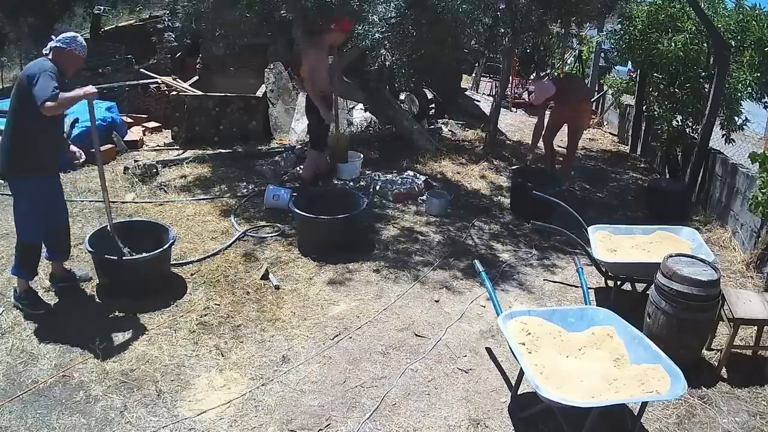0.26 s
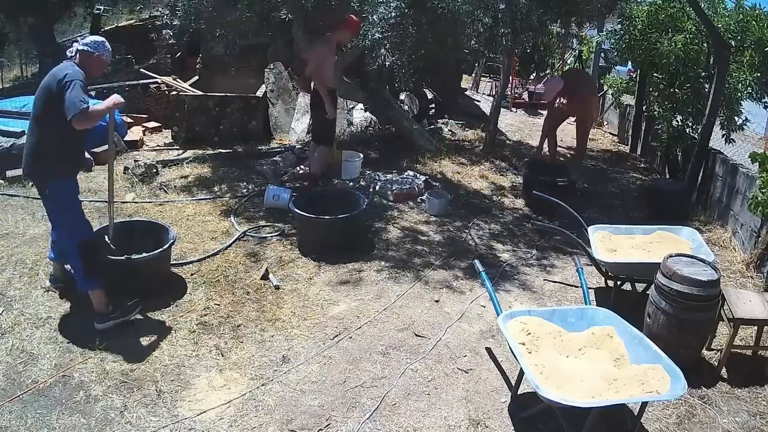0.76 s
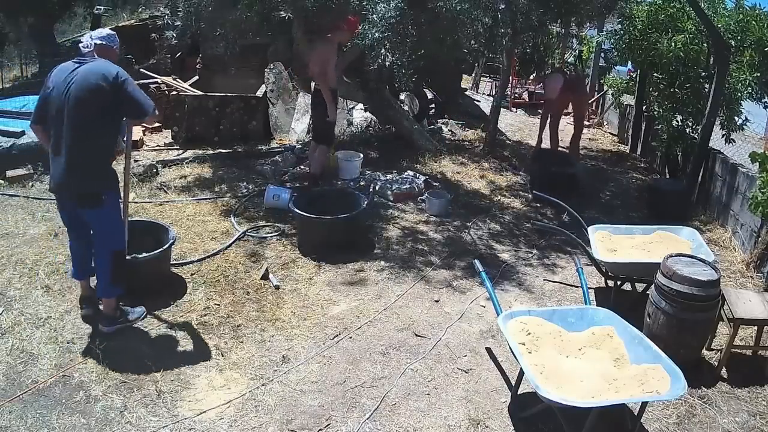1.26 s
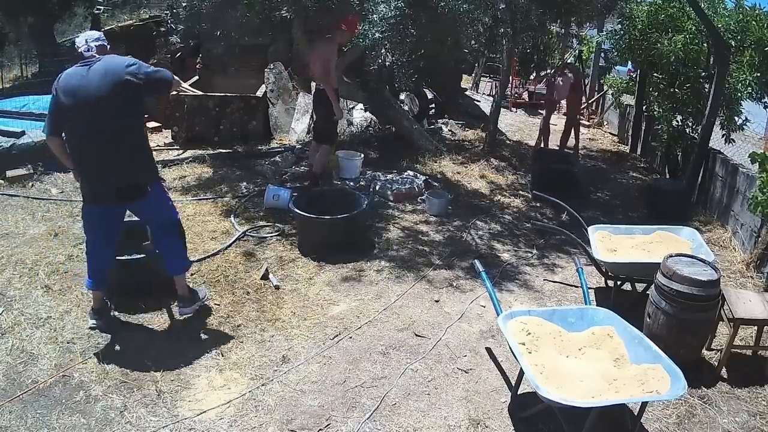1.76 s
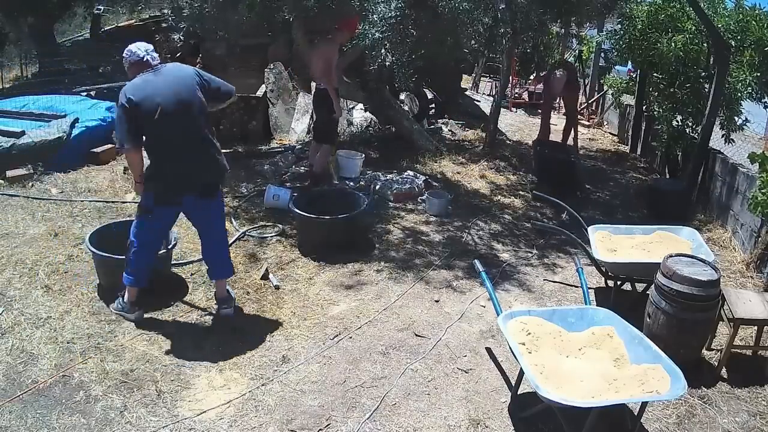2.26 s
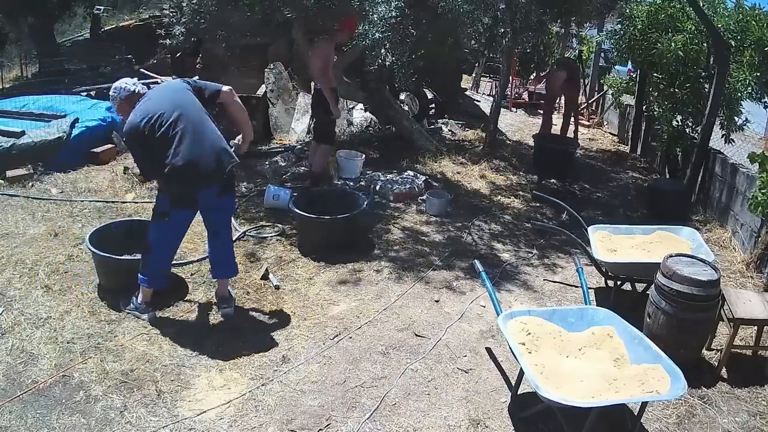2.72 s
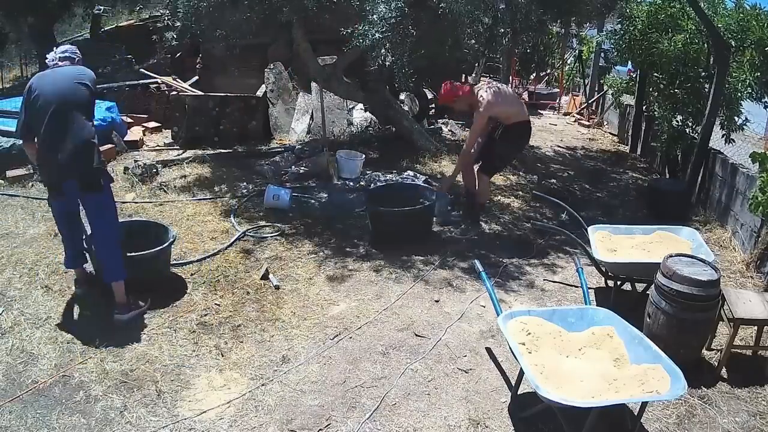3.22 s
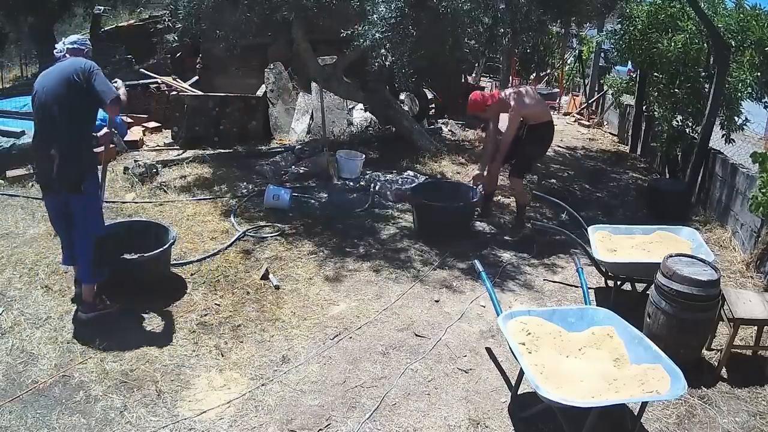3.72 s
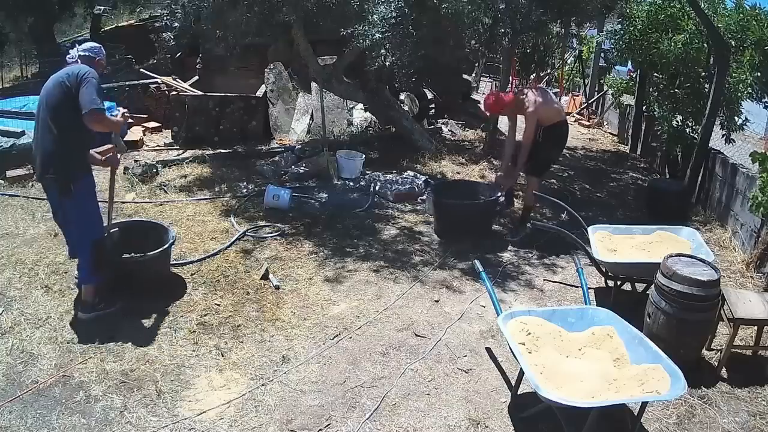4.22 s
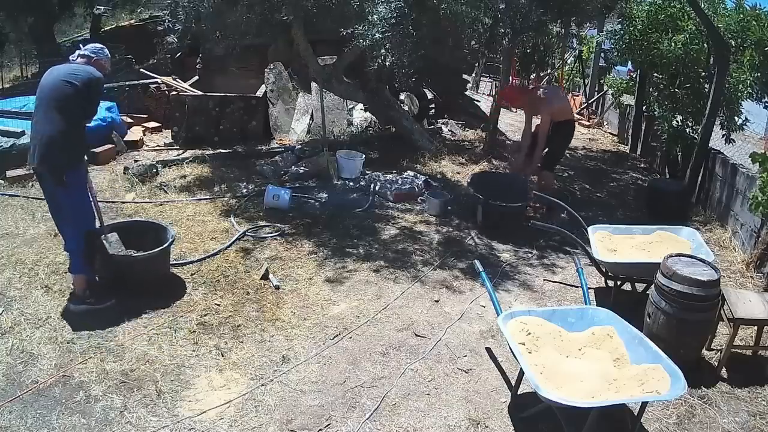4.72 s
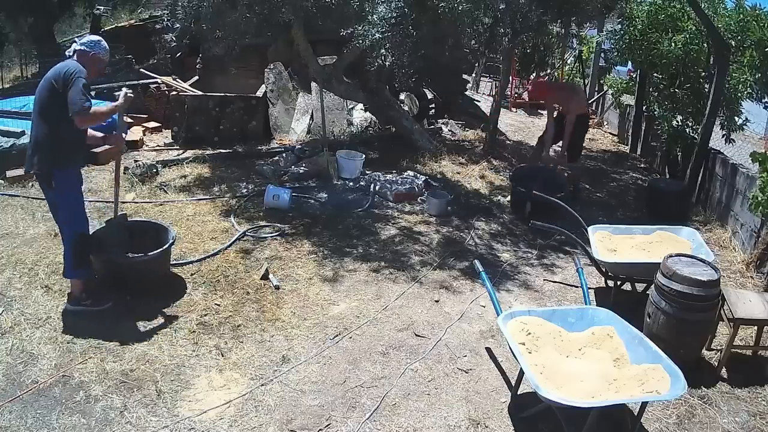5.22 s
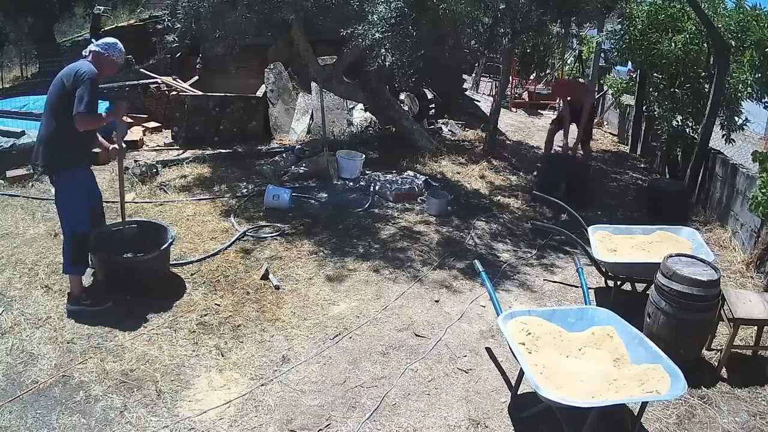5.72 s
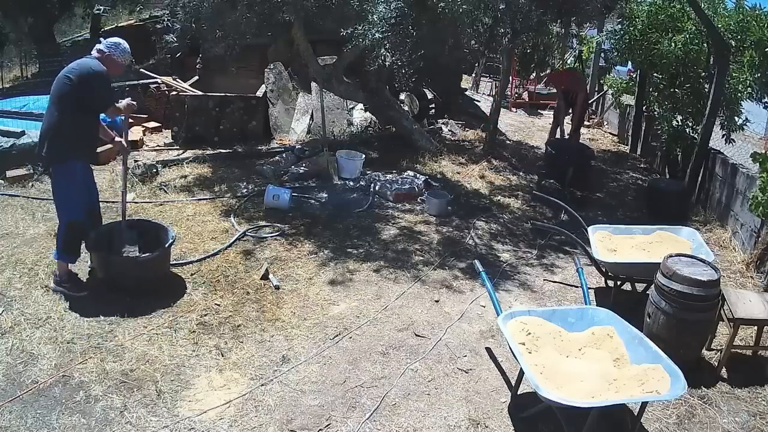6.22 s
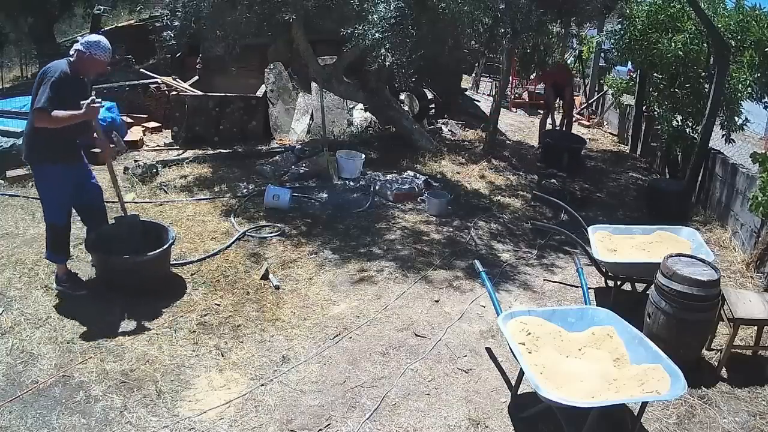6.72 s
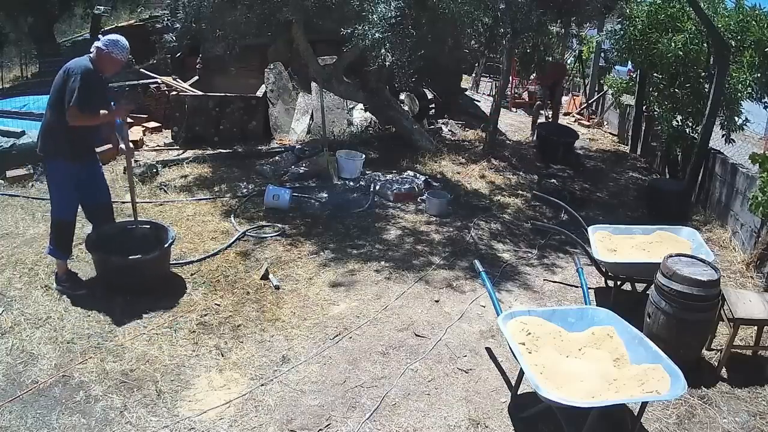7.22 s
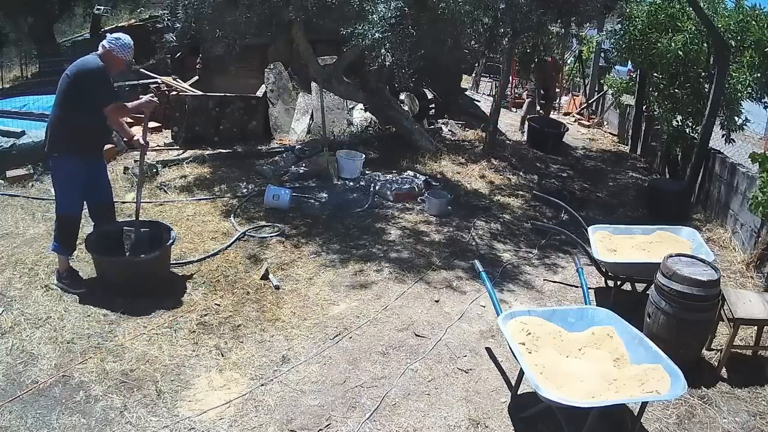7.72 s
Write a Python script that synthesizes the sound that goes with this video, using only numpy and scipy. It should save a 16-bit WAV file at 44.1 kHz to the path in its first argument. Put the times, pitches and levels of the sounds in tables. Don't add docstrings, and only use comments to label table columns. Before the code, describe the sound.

In an open yard, blades grind through wet sand and stones in rubber tubs, stroke after stroke. Hard knocks with a short metallic ring and low rubber thumps break in, loudest just before two seconds, around four and again past five. Later the scraping grows denser and louder with many small taps. A small camera some metres away picks up light wind rumble and weak echoes.

```python
import sys
import numpy as np
from scipy import signal
from scipy.fft import rfft, irfft
from scipy.io import wavfile
from scipy.ndimage import map_coordinates

SR = 44100
rng = np.random.default_rng(int(sys.argv[2]) if len(sys.argv) > 2 else 0)


def decibels_to_gain(level_db):
    exponent = np.asarray(level_db, float) / 20
    return 10 ** exponent


def materialize(psi):
    bounded = np.clip(np.atleast_2d(psi).T, -1, 1)
    quanta = np.round(bounded * 32767).astype(np.int16)
    wavfile.write(sys.argv[1], SR, quanta)


N = 351477


def unit(x):
    return x / np.sqrt(np.mean(x ** 2) + 1e-20)


def coloured(x, spectrum):
    m = 4096
    hz, db = np.transpose(spectrum)
    bins = np.fft.rfftfreq(m, 1 / SR)
    gain = decibels_to_gain(np.interp(np.log(bins + 1), np.log(hz + 1), db, -120, -120))
    cepstrum = irfft(np.log(gain + 1e-4), m)
    cepstrum[1:m // 2] *= 2
    cepstrum[m // 2 + 1:] = 0
    response = irfft(np.exp(rfft(cepstrum)), m)
    return signal.fftconvolve(x, response)[:len(x)]


def wobble(rate):
    points = rng.standard_normal(int(N * rate / SR) + 4)
    return map_coordinates(points, [np.arange(N) * rate / SR])


def add(track, s, sound):
    part = track[round(s * SR):][:len(sound)]
    part += sound[:len(part)]


def yard_air():
    # f/Hz, level/dB
    air_tone = [(24, -42), (40, 4), (241, -26), (280, -3), (1600, 3), (2570, -6.5), (3390, -7.5),
                (3740, -8), (8110, -14), (14000, -26.5), (15500, -46)]
    return decibels_to_gain(-50) * unit(coloured(rng.standard_normal(N), air_tone))


def gusts(t):
    # t/s, length/s, level/dB
    puff_table = [(-.1, 0.19, -54), (0.097, .4, -59), (.6, .22, -54.5), (1.22, 0.37, -53),
                  (1.55, 0.46, -51.5), (1.98, 0.57, -54.5), (2.5, 0.42, -68), (3.02, .32, -57),
                  (4.0, 0.32, -62), (4.502, .32, -58), (5.12, 0.49, -50.5), (5.5, 0.5, -46.5),
                  (6.13, 0.31, -40), (6.4, 0.57, -53), (7.08, 0.29, -63), (7.3, 0.4, -57),
                  (7.65, 0.35, -65)]
    calm_db = -72.5
    puffs = [decibels_to_gain(db) * np.sin(np.pi * np.clip((t - s) / length, 0, 1)) for s, length, db in puff_table]
    return decibels_to_gain(calm_db) + np.sqrt(np.sum(np.square(puffs), axis=0))


def wind(t):
    # f/Hz, level/dB
    rumble_tone = [(13, -54), (22, -43), (65, -9), (118, -3.5), (156, -11.5), (200, -9), (260, -32),
                   (440, -120)]
    strength = gusts(t)
    rumble = coloured(rng.standard_normal(N), rumble_tone)
    return strength * unit(decibels_to_gain(3.8 * wobble(22)) * rumble)


def echoes(x):
    t = np.arange(SR // 6) / SR
    first_s, t60 = 0.003, 0.12
    tail = rng.standard_normal(len(t)) * decibels_to_gain(-60 * t / t60) * (t > first_s)
    return signal.fftconvolve(x, tail / np.linalg.norm(tail))[:N]


def thumps():
    # t/s, peak level/dB, f/Hz, t60/s
    thump_table = [(0.019, -15.5, 186, 0.022), (0.226, -38, 94.36, 0.053), (.708, -29.5, 146, 0.038),
                   (1.242, -15, 240, 0.015), (1.315, -29, 210, 0.046), (1.411, -34.5, 159, 0.053),
                   (1.56, -40, 149, 0.053), (1.63, -40, 145.4, 0.058), (1.74, -39, 170, .04),
                   (1.8, -31, 250, .04), (1.829, -7.5, 532, 0.027), (1.8314, -3, 276, 0.031),
                   (2.185, -27.5, 125, 0.045), (2.87, -45, 80, 0.045), (3.11, -37, 230, 0.051),
                   (3.995, -1.5, 200, 0.016), (4.039, -25, 184, 0.047), (5.334, -4, 197, 0.016),
                   (5.58, -30, 108, .06), (5.712, -32, 90, 0.042), (5.791, -17, 187, 0.041),
                   (5.824, -19.5, 117, 0.1), (5.85, -24, 348, 0.035), (6.155, -23.5, 106, 0.07),
                   (6.25, -20.5, 95.3, 0.052), (6.288, -16, 129, 0.11), (6.335, -25, 190, .04),
                   (6.366, -24, 167, 0.045), (6.888, -24, 297, 0.049), (7.225, -27, 334, 0.054)]
    out, t = np.zeros(N), np.arange(SR // 5) / SR
    for s, db, hz, t60 in thump_table:
        turns = hz * (t + 0.00094 * (1 - np.exp(-t / 0.011)))
        swing = np.sin(2 * np.pi * turns) + decibels_to_gain(-5.5) * np.sin(2 * np.pi * 1.43 * turns)
        onset = 1 - np.exp(-t / 0.0015)
        add(out, s, -decibels_to_gain(db - 60 * t / t60) * swing * onset)
    return out


def stone_ping():
    # t/s, level/dB and t60/s around its f/Hz, in the order t, f, level, t60
    ping = (7.191, 3800, -23, .022)
    s, hz, db, t60 = ping
    out, t = np.zeros(N), np.arange(SR // 10) / SR
    add(out, s, decibels_to_gain(db - 60 * t / t60) * np.sin(2 * np.pi * hz * t) * (1 - np.exp(-t / 0.00066)))
    return out


def knocks():
    # t/s, peak level/dB, ring f/Hz, crack level/dB
    knock_table = [(0.413, -16.5, 2290, -17), (1.241, -7, 1860, -38), (1.817, -17, 1980, -35),
                   (1.829, 1.5, 1190, -32), (1.855, -5.5, 1990, -12), (2.786, -17.5, 1250, -21),
                   (3.26, -18, 680, -30), (3.792, -8, 1830, -43), (3.879, -10.5, 988.5, -19),
                   (3.966, -7.5, 990.9, -28), (3.993, -6, 2450, -11), (4.288, -22, 918.9, -10),
                   (4.393, -8, 2560, -18.5), (4.958, -16.5, 1340, -17), (5.164, -17, 1810, -16),
                   (5.197, -14, 1263, -34.5), (5.288, -17, 1450, -29), (5.346, -2.5, 1055, -15),
                   (5.358, -2.5, 1075, -27), (5.402, -8, 1824, -18), (5.715, -11.5, 1840, -9),
                   (5.95, -10, 1790, -28), (6.126, -13.5, 1470, -10), (6.289, -16, 1800, -5.5),
                   (6.474, -8.5, 1170, -12.5), (6.533, -10.5, 1115, -31), (6.612, -13, 1920, -20),
                   (6.832, -10, 1480, -15.5), (6.885, -4, 1610, -16.5), (7.705, -20, 1860, -13)]
    # t/s, peak level/dB, ring f/Hz
    tap_table = [(1.065, -22, 1150), (1.178, -20, 1930), (1.342, -22, 1430), (2.435, -18.5, 1920),
                 (3.072, -25.5, 1120), (3.412, -23, 1430), (3.674, -19, 1240), (3.849, -19.5, 1150),
                 (3.868, -23, 1863), (4.738, -22, 1330), (5.064, -22, 1240), (5.45, -18.5, 1620),
                 (5.543, -22, 1610), (5.74, -27, 1134), (5.99, -23, 2000), (6.084, -16, 1910),
                 (6.202, -15.5, 1900), (6.278, -28, 1510), (6.339, -16, 1850), (6.516, -13, 1860),
                 (6.551, -13.5, 1840), (6.673, -18, 1190), (6.742, -19, 1840), (6.989, -26, 1830),
                 (7.018, -20.5, 1460), (7.18, -23, 1780), (7.224, -16, 1900), (7.385, -30, 1090),
                 (7.583, -20, 1140), (7.737, -23.5, 1943)]
    # f/Hz, width/Hz, level/dB
    housing_modes = [
        (1115, 120, -7),
        (1830, 360, 3.5),
        (600, 227, -5.5),
    ]
    # f/Hz, level/dB
    crack_tone = [(1500, -7), (2600, 1), (4500, -8.5), (7000, -15), (12000, -23), (15000, -50)]
    tap_crack_db, ring_t60, early_s = -23.5, 0.019, 0.0006
    out, cracks, t = np.zeros(N), np.zeros(N), np.arange(SR // 10) / SR
    hits = knock_table + [(*tap, tap_crack_db) for tap in tap_table]
    noises = rng.standard_normal((len(hits), 3, len(t)))
    swell = (1 - np.exp(-t / 0.00089)) ** 2
    fade = decibels_to_gain(-60 * t / ring_t60) * swell
    for (s, db, hz, crack_db), (scatter, rattle, crack) in zip(hits, noises):
        ring = np.sin(2 * np.pi * hz * t) * fade
        for (mode_hz, width, mode_db), chance in zip(housing_modes, scatter):
            mode = np.sin(2 * np.pi * mode_hz * t) * np.exp(-np.pi * width * t) * swell
            ring = ring + decibels_to_gain(mode_db + 1.0 + 2.4 * chance) * mode
        rattle = signal.lfilter([1, 0, -1], [1, -1.85, .92], rattle)
        ring = ring + decibels_to_gain(-30) * rattle * swell * decibels_to_gain(-35 * t / ring_t60)
        add(out, s - early_s, decibels_to_gain(db - 5) * ring / np.abs(ring).max())
        snap = crack * fade ** 1.43 * (1 - np.exp(-t / 0.00056))
        add(cracks, s - early_s, decibels_to_gain(db + crack_db + 8) * snap)
    click = np.eye(1, 4096)[0]
    scale = np.linalg.norm(coloured(click, crack_tone))
    return out + coloured(cracks, crack_tone) / scale


def sand(density, spread_db, share):
    chance, size, sign = rng.random(N), rng.exponential(size=N), rng.standard_normal(N)
    stones = (chance < density / SR) * sign * decibels_to_gain(spread_db * np.minimum(size, 4))
    share = np.clip(share, 0, 1)
    return np.sqrt(share) * unit(stones) + np.sqrt(1 - share) * rng.standard_normal(N)


def strokes(t):
    # t/s, length/s, level/dB, tub wall weight/dB, dry grit weight/dB
    stroke_table = [(0.0, 0.21, -39.5, -9, -14), (0.276, 0.81, -42, -11, -13.5),
                    (1.063, 0.29, -37.5, -11.5, -9.5), (1.417, 0.3, -55.5, -3.5, -9),
                    (1.886, 0.056, -42, -6.5, -10.5), (1.98, 0.17, -36, -8.5, -13),
                    (2.213, 0.24, -34.5, -6, -20), (2.497, .28, -39.5, -4.5, -21),
                    (3.088, .25, -45, -2.5, -13), (3.406, 0.63, -42.5, -6, -13),
                    (4.04, 0.3, -46.5, -1, -25), (4.225, 0.14, -41.5, -3.5, -9.5),
                    (4.385, 0.37, -40, -7.5, -14), (4.75, 0.19, -39, -6.5, -10.5),
                    (5.018, 0.16, -45, -3.5, -7), (5.17, 0.17, -51, -8, -16), (5.4, 0.27, -37.5, -5, -11.5),
                    (5.702, 0.25, -34.5, -7, -10), (5.997, 0.23, -36, -5, -4), (6.252, 0.38, -32, -7, -14),
                    (6.682, 0.22, -35, -7.5, -11), (6.963, 0.16, -37.5, -7, -11.5),
                    (7.171, 0.46, -38, -4.5, -10.5), (7.69, 0.24, -39, -7, -8.5)]
    bite_s, let_go_db_per_s, sag_db = 0.026, 114, 1
    power = np.full((3, N), 1e-12)
    for start, length, db, wall_db, grit_db in stroke_table:
        u = t - start
        bite = np.clip(u / bite_s + 1, 0, 1)
        sag = sag_db * np.clip(u / length, 0, 1)
        let_go = let_go_db_per_s * np.clip(u - length, 0, None)
        shape = bite * decibels_to_gain(-sag - let_go)
        level = decibels_to_gain(db + np.array([0, wall_db, grit_db]))
        power += (level[:, None] * shape) ** 2
    return np.sqrt(power)


def skids(t):
    # t/s, length/s, level/dB, tub wall weight/dB, dry grit weight/dB
    skid_table = [(0.405, 0.037, -47.5, -20, 6), (0.822, 0.027, -43, -6, -3.5),
                  (1.238, 0.015, -40.5, 0.5, -1), (1.81, 0.015, -17.5, -13, -22),
                  (1.83, 0.02, -28.5, 14, -20), (1.859, 0.024, -54.5, 22, -9), (2.259, 0.047, -42.5, 0, -6),
                  (3.084, 0.043, -62.5, -11, 8), (3.259, 0.032, -38, -18, -29),
                  (3.86, 0.033, -33.5, 6.5, 1.5), (3.885, 0.039, -29, -10, -19),
                  (3.976, 0.025, -27, 2.5, -9.5), (3.999, 0.027, -38.5, -1.5, -6),
                  (4.284, 0.037, -47, 5.5, -12), (5.159, 0.089, -37.5, -6.5, -18),
                  (5.284, 0.031, -34.5, -2, -5), (5.333, .031, -18, -15, -13.5), (5.37, 0.028, -44, 3, 2),
                  (5.397, 0.019, -27.5, -5, -6.5), (6.108, 0.049, -34.5, -9, -14),
                  (6.284, 0.05, -45, 1, -27), (6.827, 0.031, -34, 1, -3), (6.876, 0.023, -33, -4, -9),
                  (7.172, 0.034, -57.5, -16, 14.5)]
    drive, fizz = np.zeros((3, N)), np.zeros(N)
    judder = decibels_to_gain(1.9 * wobble(220))
    for start, length, db, wall_db, grit_db in skid_table:
        u = np.clip((t - start) / length, 0, None)
        slide = np.minimum(u / 0.3, 1) * decibels_to_gain(-30 * np.clip(u - .8, 0, None))
        level = decibels_to_gain(db + np.array([0, wall_db, grit_db]))
        drive += level[:, None] * slide * judder
        fizz += decibels_to_gain(db + grit_db - 8.5) * slide
    return drive, fizz


def stirring(t):
    # f/Hz, level/dB
    grind_tone = [(380, -71), (650, -9.5), (707, -6.5), (817, -3), (1140, 3.5), (1330, -1.5), (1430, 1.5),
                  (1660, 0.5), (1870, 2.5), (2160, -4), (4000, -22), (5200, -32.5), (8800, -120)]
    wall_tone = [(76, -66), (130, -7), (172, -7.5), (232, 1.5), (355, 0.5), (397, -1), (442, -2.5),
                 (703, -1), (800, -3.5), (1040, -29.5), (1760, -120)]
    grit_tone = [(1530, -9), (2600, 0.5), (3090, -3), (3350, -2.5), (5470, -8.5), (5980, -11),
                 (8000, -25.5), (10400, -50), (17600, -120)]
    fizz_tone = [(4410, -24), (7500, -3), (11100, -9.5), (12000, -18), (15100, -28), (15300, -30)]
    grind, wall, grit = strokes(t)
    finest_db, grit_mid_db, follows = -62.5, -52, 0.4
    fizz = decibels_to_gain(finest_db) * (grit / decibels_to_gain(grit_mid_db)) ** follows

    lumps = 0.85 * wobble(14) + 1.23 * wobble(45)
    grind = grind * decibels_to_gain(lumps + 0.4 * wobble(25))
    wall = wall * decibels_to_gain(0.6 * lumps + 1.5 * wobble(18))
    grit = grit * decibels_to_gain(1.3 * lumps + 1.6 * wobble(30))
    fizz = fizz * decibels_to_gain(2.4 * lumps)

    (skid_grind, skid_wall, skid_grit), skid_fizz = skids(t)
    coarse = sand(density=1500, spread_db=3.5, share=0.32)
    clods = 0.52 * coarse + sand(density=270, spread_db=4, share=0.44)
    fine = sand(density=900, spread_db=4.5, share=0.34)
    finest = sand(density=2300, spread_db=7.5, share=0.25)
    out = (grind + skid_grind) * unit(coloured(coarse, grind_tone))
    out += (wall + skid_wall) * unit(coloured(clods, wall_tone))
    out += (grit + skid_grit) * unit(coloured(fine, grit_tone))
    out += (fizz + skid_fizz) * unit(coloured(finest, fizz_tone))
    return out


def scene():
    t = np.arange(N) / SR
    blows = knocks() + stone_ping() + thumps()
    mix = yard_air() + wind(t) + blows + decibels_to_gain(-13.5) * echoes(blows) + stirring(t)
    return mix[None]


def low_pass(x):
    return signal.sosfilt(signal.butter(12, 15710, fs=SR, output="sos"), x)


def record(dry):
    low_cut = signal.butter(2, 60, "highpass", fs=SR, output="sos")
    high_cut = signal.cheby2(8, 40, 15800, fs=SR, output="sos")
    heard = signal.sosfilt(np.vstack([low_cut, high_cut]), dry)
    return low_pass(np.clip(heard, -1, 1))


dry = scene()
out = record(dry)
materialize(out)
```